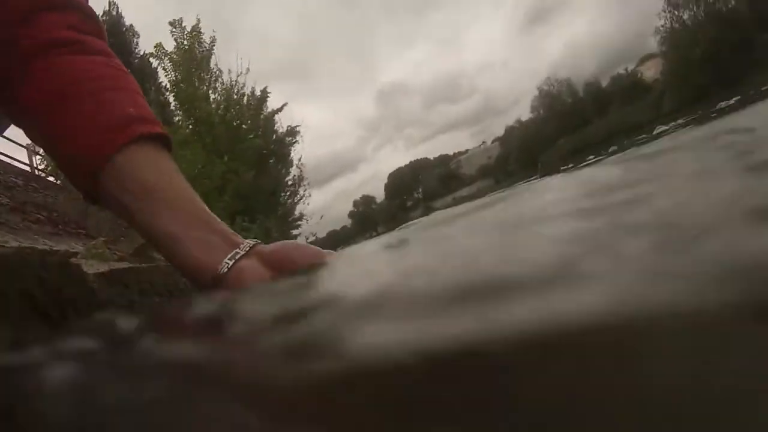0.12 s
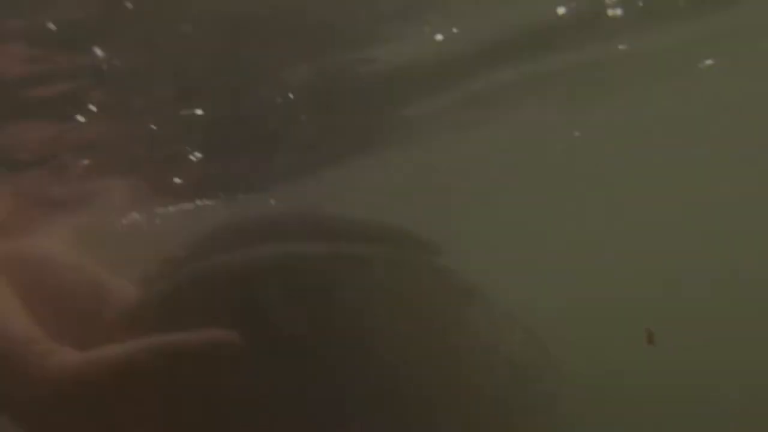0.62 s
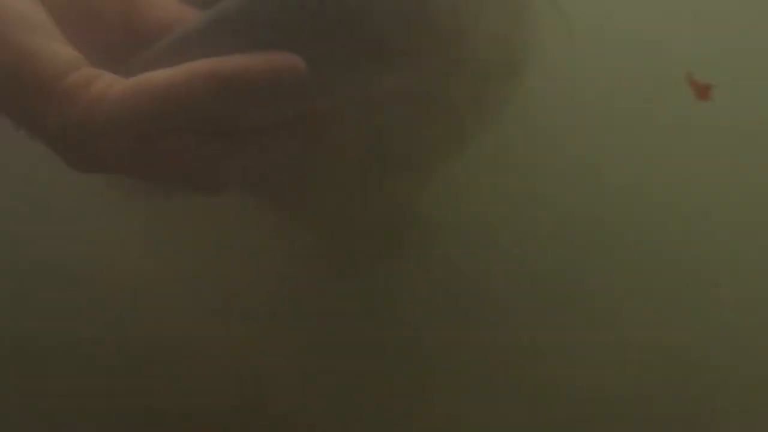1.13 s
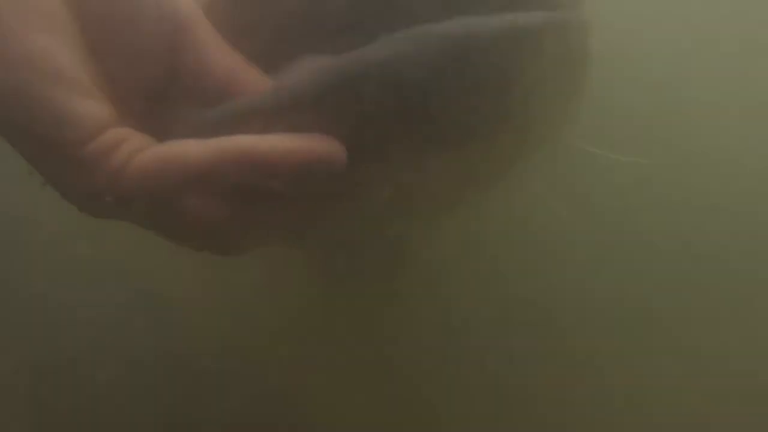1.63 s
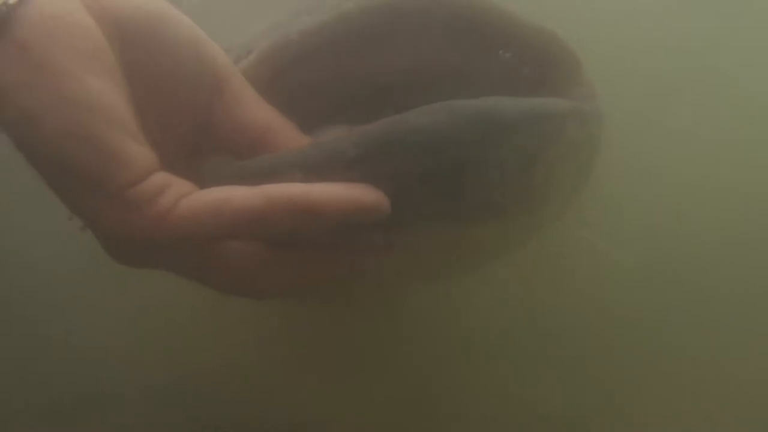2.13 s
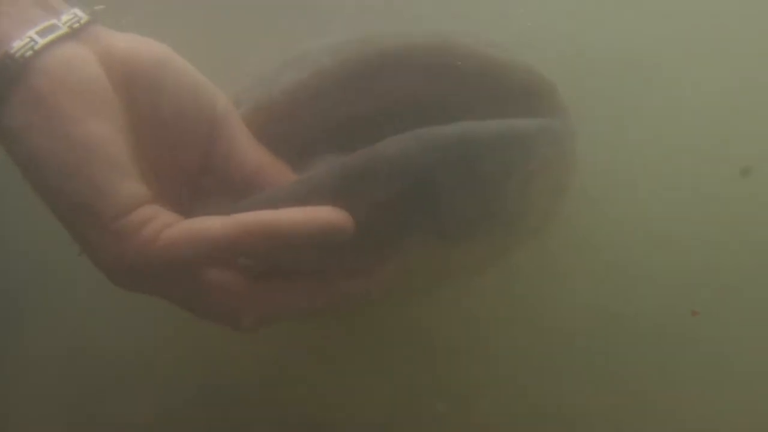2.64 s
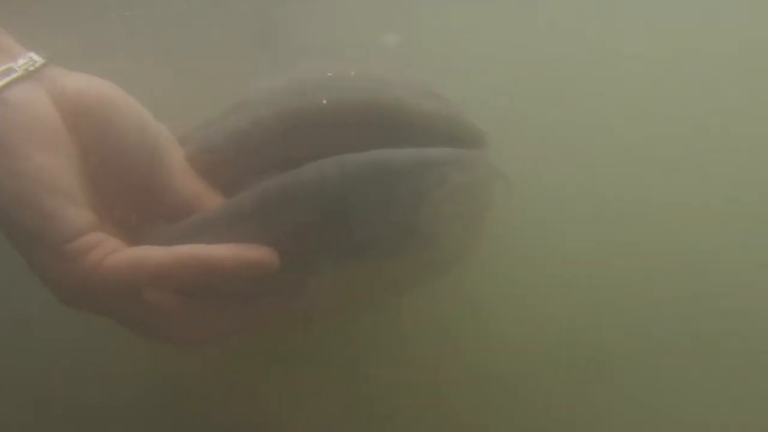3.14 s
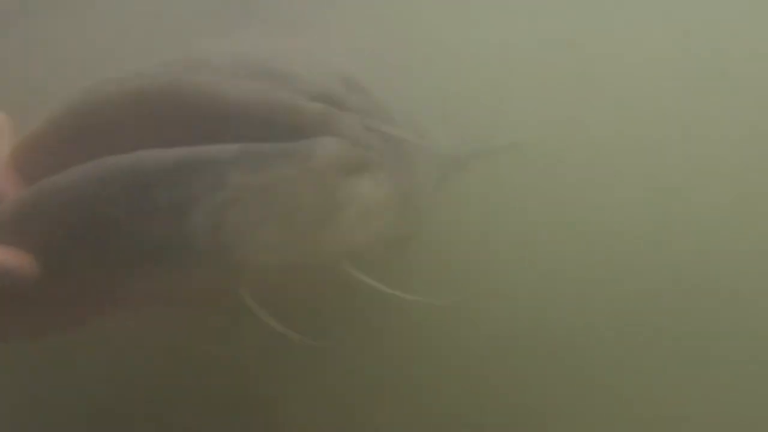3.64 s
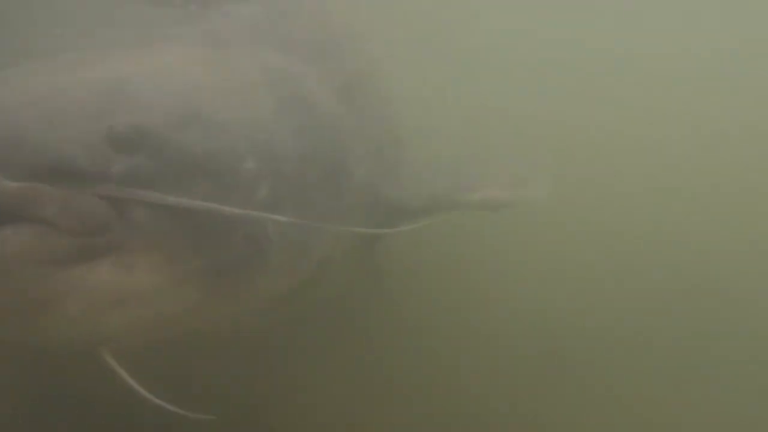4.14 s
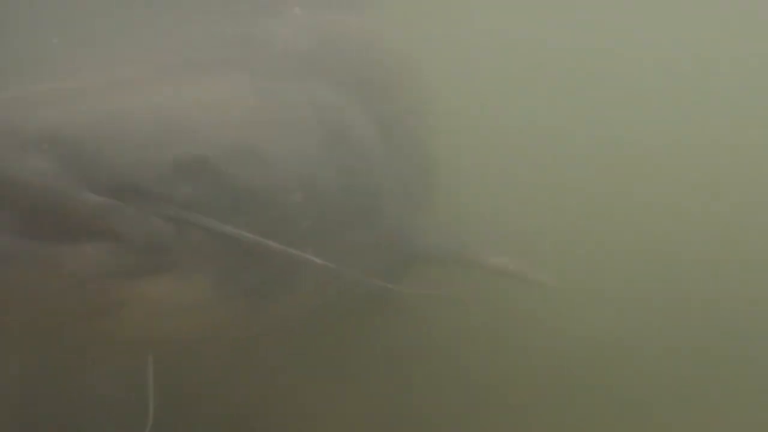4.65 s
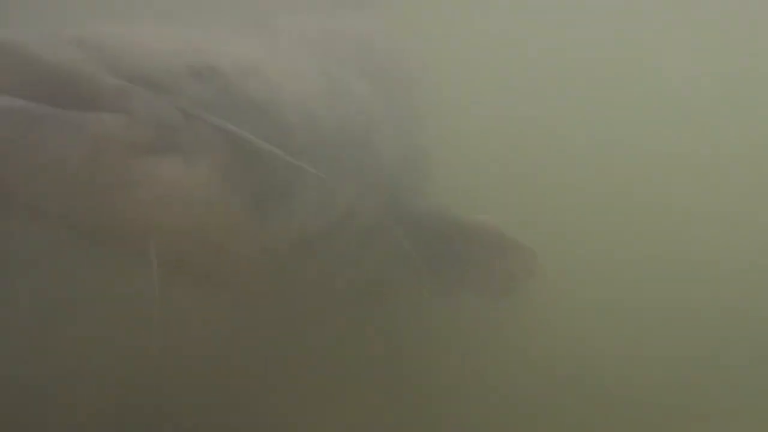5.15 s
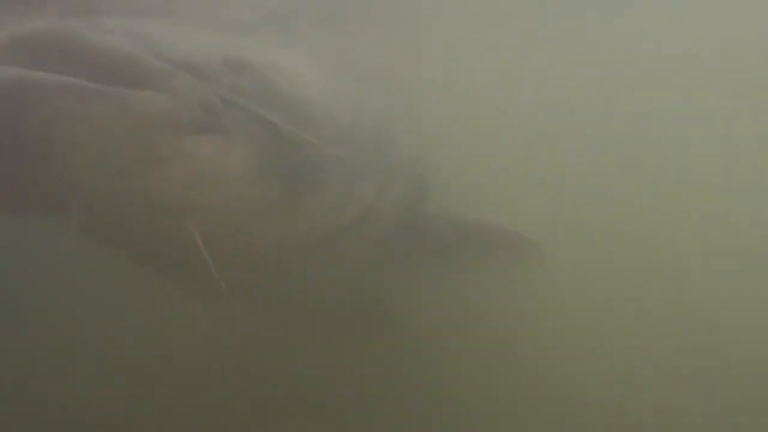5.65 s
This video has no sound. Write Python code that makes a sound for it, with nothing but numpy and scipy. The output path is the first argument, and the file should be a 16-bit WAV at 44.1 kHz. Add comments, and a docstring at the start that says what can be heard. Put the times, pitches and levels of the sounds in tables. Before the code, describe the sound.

A small camera housing is pushed into river water with hard plastic clacks and splashes, then low muffled underwater throbbing and two later clicks.

```python
"""River, just at and under the surface: a small camera in a waterproof housing is pushed in.
Water slaps the housing; trapped air pockets clack and ring as decaying sines with knocks and noisy spray.
Fine bubbles fizz as shaped noise, then slow surges throb on the microphone as smooth pressure dips.
Behind them eddies rumble, gurgle and wash as shaped noise with wandering levels.
The recorder's ring buffer is read late, so each block starts with a sliver from one lap ahead: faint ticks."""
import sys
import numpy as np
from scipy import signal
from scipy.fft import rfft, irfft
from scipy.io import wavfile
from scipy.ndimage import uniform_filter1d

SR = 44100
rng = np.random.default_rng(int(sys.argv[2]) if len(sys.argv) > 2 else 0)


def unload_audio(sound):
    """Save the sound as a 16-bit wav file, at the path given as the first command line argument."""
    columns = np.transpose(np.atleast_2d(sound))
    # keep every value between -1 and 1, then stretch to whole-number steps
    steps = np.round(np.clip(columns, -1, 1) * 32767)
    wavfile.write(sys.argv[1], SR, steps.astype(np.int16))


def rack_gain(trim_db):
    """Turn a fader trim in dB into the linear factor to multiply a signal by."""
    fader = np.asarray(trim_db, float)
    return 10 ** (fader / 20)


N = 254898
SUNK_S = .95  # the housing is under from here on

# flow past the housing: (time [s], rumble level [dB])
FLOW = [(0, -53), (.37, -43), (.66, -49), (.93, -44), (1.5, -46), (2.0, -50), (2.7, -52), (4.25, -55),
        (5.78, -57)]


def coloured(x, spectrum):
    """Shape x by (frequency [Hz], relative density [dB per Hz]) points and bring it to rms 1."""
    hz, db = np.transpose(spectrum)
    f = np.maximum(np.arange(N // 2 + 1) * SR / N, 1)
    gain = rack_gain(np.interp(np.log(f), np.log(hz), db))
    y = irfft(rfft(x) * gain, N)
    return y / np.std(y)


def curve(s, db):
    """Gain along time, straight in dB between the points."""
    return rack_gain(np.interp(np.arange(N) / SR, s, db))


def walk(rate):
    """Wandering control signal: random values held for 1 / rate seconds, then smoothed twice."""
    hold = int(SR / rate)
    steps = np.repeat(rng.standard_normal(N // hold + 1), hold)
    smooth = uniform_filter1d(uniform_filter1d(steps, hold), hold)
    return 1.1 * smooth[:N]


def add(out, s, sound):
    """Mix a sound in at time s, cut off at the end of the scene."""
    i = max(int(s * SR), 0)
    out[i:i + len(sound)] += sound[:N - i]


def ring(hz, t60, t):
    """One resonant mode: a sine that falls by 60 dB in t60 seconds."""
    return np.sin(2 * np.pi * hz * t) * np.exp(-np.log(1000) * t / t60)


def clacks():
    """Each clack swells its own air pocket, pushes the housing into ringing and throws spray."""
    # air pockets and plastic:
    # (time [s], ring peak [dB], ring frequency [Hz], ring t60 [s], housing level [dB])
    clack_table = [(.001, -34, 1484, .043, -33), (.013, -37, 3217, .021, -47), (.053, -45, 1326, .034, -47),
                   (.069, -49, 2200, .01, -46), (.1205, -45, 1557, .025, -33),
                   (.1245, -4.5, 1050, .009, -7), (.125, -14, 2100, .015, -47),
                   (.1315, -13, 1900, .008, -15), (.154, -50, 4520, .012, -46),
                   (.179, -31, 5557, .0064, -46), (.1845, -20, 1217, .085, -24), (.186, -31, 494, .1, -48),
                   (.234, -40, 4200, .015, -53), (.278, -33, 813, .024, -33), (.326, -32, 3111, .017, -30),
                   (.338, -18, 1767, .013, -18), (.35, -40, 4167, .007, -43), (.366, -25, 5895, .004, -36),
                   (.369, -12.5, 1242, .02, -18), (.3905, -7, 1968, .01, -22),
                   (.402, -10.5, 5307, .005, -17), (.4025, -15, 2642, .043, -26),
                   (.414, -3, 2407, .007, -3.5), (.435, -36, 3500, .007, -36), (.446, -24, 676, .032, -25),
                   (.459, -44, 4670, .008, -49), (.501, -22, 1079, .021, -23), (.637, -24, 445, .005, -31),
                   (.668, -15, 1692, .01, -7.5), (.674, -7, 1500, .005, -5.5), (.677, -14, 1893, .03, -14),
                   (.677, -17, 150, .042, -50), (.6805, -5, 725, .03, -8.5), (.708, -14, 651, .028, -20),
                   (.709, -13.5, 160, .036, -50), (.712, -9, 678, .035, -7), (.717, -12, 778, .013, -6.5),
                   (.750, -19, 716, .025, -11), (.753, -13.5, 153, .063, -47), (.754, -16, 681, .027, -1.5),
                   (.7585, -16, 1500, .006, -5.5), (.864, -40, 1520, .013, -56),
                   (.917, -17, 2562, .019, -31), (.9172, -17, 1550, .006, -36), (.918, -24, 916, .033, -35),
                   (1.034, -42, 700, .04, -48), (1.4332, -7.5, 1124, .041, -12),
                   (1.4335, -17, 404, .018, -40), (1.4336, -8.5, 1050, .014, -45),
                   (2.8105, -36, 718, .018, -36), (2.8108, -41, 1297, .015, -50),
                   (3.454, -47, 199, .067, -62), (4.262, -46, 221, .086, -60), (4.642, -48, 230, .092, -60),
                   (4.84, -50, 240, .08, -62), (5.1408, -12, 800, .05, -32), (5.1413, -20, 2305, .008, -35),
                   (5.143, -31, 1357, .03, -55), (5.1433, -17, 860, .03, -45),
                   (5.1444, -21, 1037, .034, -50), (5.53, -46, 150, .03, -60), (5.61, -48, 200, .06, -62)]
    # modes of the housing: (frequency [Hz], relative level [dB], t60 [s])
    housing_modes = [(155, -27, .08), (232.6, -11.5, 0.19), (420, -2.5, 0.027), (634, 1, 0.034),
                     (985, -6, 0.043), (1500, -6, 0.026), (1917, 0, 0.015), (2460, -2, 0.0061),
                     (3500, -2.5, 0.007), (5500, -12.5, .012)]
    # spray grows more slowly than the ring, favours small bright pockets, and dies down once under
    spray_base_db, spray_db_per_db, spray_db_per_octave, sunk_spray_db = -17, .55, 3, -9

    out, t = np.zeros(N), np.arange(int(SR / 4)) / SR
    housing = sum(rack_gain(db) * ring(hz, t60, t) for hz, db, t60 in housing_modes)
    housing /= np.abs(housing).max()
    for s, ring_db, hz, t60, housing_db in clack_table:
        swell = 1 - np.exp(-t * hz / 2.3)  # the pocket fills over a few cycles
        settle = .4 + np.exp(-(t / (0.12 * t60)) ** 2)  # a loud first wobble, then a quieter tail
        pocket = swell * settle * ring(hz, t60, t)

        push = np.hanning(int(.4 * SR / hz) + 3)  # a big pocket pushes longer, so the knock is duller
        knock = np.convolve(housing, push / push.sum())

        # spray: noise loosely centred on the pocket's pitch, dying sooner than its ring
        band = signal.butter(2, [hz / 2.2, hz * 2], "band", fs=SR, output="sos")
        spray = signal.sosfilt(band, rng.standard_normal(len(t)))
        spray /= np.std(spray)
        spray *= swell * np.exp(-np.log(1000) * t / (0.44 * t60))
        spray_db = spray_base_db + spray_db_per_db * ring_db
        spray_db += spray_db_per_octave * np.log2(hz / 1000)
        spray_db += sunk_spray_db * (s > SUNK_S)

        add(out, s, rack_gain(ring_db) * pocket / np.abs(pocket).max())
        add(out, s, rack_gain(housing_db) * knock)
        add(out, s, rack_gain(spray_db) * spray)
    return out


def splash(bursts_per_s=1500, scatter_db=5.0):
    """Fine bubbles: dense small bursts of unequal size over a hiss; each wave rises, holds and fades."""
    # waves of bubbles churning round the housing: (hold start [s], level [dB], hold [s])
    wave_table = [(0, -54, .02), (.06, -60, .005), (.133, -29, .003), (.19, -54, .04), (.282, -45, .045),
                  (.338, -35, .006), (.385, -38, .04), (.645, -45, .04), (.715, -46, .015),
                  (.755, -43, .04), (.8, -47, .03), (.865, -54, .004), (.919, -40, .002), (1.52, -57, .02),
                  (1.96, -61, .015), (2.56, -64, .07)]
    # colour of the fizz: (frequency [Hz], relative density [dB per Hz])
    fizz_colour = [(150, -19.5), (400, 5), (900, 1.5), (1900, 0.5), (2800, -7.5), (3700, -14.5),
                   (5000, -27), (8000, -31.5), (14000, -46)]
    rise_db_s, fall_db_s, rest_db = 1300, 1000, -76  # slopes in dB per second; level between waves

    struck = rng.random(N) < bursts_per_s / SR
    sizes = rack_gain(scatter_db * np.minimum(rng.exponential(size=N), 3))
    smear = signal.lfilter([1], [1, -np.exp(-1 / (0.0005 * SR))], struck * sizes)  # 0.5 ms decays
    fizz = coloured((smear + 1.0) * rng.standard_normal(N), fizz_colour)

    t = np.arange(N) / SR
    waves = np.zeros(N)
    for s, db, hold in wave_table:
        rise = rise_db_s * np.maximum(s - t, 0)
        fall = fall_db_s * np.maximum(t - s - hold, 0)
        waves += rack_gain(db - rise - fall)
    return fizz * (waves + rack_gain(rest_db))


def surges():
    """Each surge is a smooth dip of pressure; lesser nudges come at random once the housing is under."""
    # the strongest surges of water on the microphone membrane:
    # (time [s], depth [dB], half width to 1/e [ms])
    surge_table = [(0.569, -32, 11), (0.681, -31, 11), (0.719, -28, 9.5), (0.752, -33, 17), (0.824, -33, 8),
                   (0.927, -32.2, 6.5), (0.963, -22.7, 18), (1.006, -29.4, 4.5), (1.031, -32.2, 4.5),
                   (1.057, -26.0, 9), (1.17, -19.2, 9), (1.195, -30.6, 18), (1.224, -32.3, 4.5),
                   (1.291, -23.7, 6.5), (1.316, -29.1, 18), (1.359, -17.5, 13), (1.423, -30.0, 9),
                   (1.614, -25.5, 9), (1.699, -28.9, 18), (1.757, -26.7, 13), (1.824, -27.9, 6.5),
                   (1.902, -25.5, 18), (1.962, -26.9, 18), (2.084, -33.4, 18), (2.15, -31.5, 18),
                   (2.219, -32.6, 9), (2.314, -39.2, 9), (2.353, -36.4, 9), (2.75, -38.5, 13),
                   (2.858, -36.7, 13), (2.887, -37.4, 18), (3.129, -37.5, 6.5), (3.399, -36.8, 9),
                   (3.465, -38.8, 13), (3.704, -39.9, 13), (3.748, -34.5, 9), (3.806, -33.2, 6.5),
                   (3.831, -35.1, 18), (3.881, -34.5, 13), (3.942, -32.3, 13), (3.969, -37.2, 18),
                   (4.22, -36.3, 18), (4.298, -38.6, 18), (4.351, -33.5, 13), (4.413, -38.8, 6.5),
                   (4.474, -37.3, 9), (5.009, -39.4, 13), (5.068, -36.9, 13), (5.13, -38.3, 6.5)]
    # small sharp nudges between the surges, sized by the flow
    nudges_per_s, nudge_db, scatter_db, nudge_ms = 14, 5, 4, (2.2, 6.)

    out, t = np.zeros(N), np.arange(-.05, .05, 1 / SR)
    # drawn for the whole length, then squeezed into the time under water
    when, size, width = rng.random((int(nudges_per_s * N / SR), 3)).T
    when = SUNK_S + when * (N / SR - SUNK_S)
    flow_db = np.interp(when, *np.transpose(FLOW))
    depth_db = flow_db + nudge_db - scatter_db * np.log(1 - size)  # many small, few deep
    nudges = zip(when, depth_db, np.interp(width, [0, 1], nudge_ms))
    for s, db, ms in [*surge_table, *nudges]:
        dip = -np.exp(-(1000 * t / ms) ** 2)
        add(out, s + t[0], rack_gain(db) * dip)
    return out


def flow():
    """Eddies rumble in lumps; they gurgle in short bursts, and the wash above flickers."""
    # low eddies: (frequency [Hz], relative density [dB per Hz])
    rumble_colour = [(4.7, -27.5), (8.0, 3.5), (29, 10.5), (65, -8), (193, -31), (222, -21.5), (266, -21.5),
                     (300, -31.5), (390, -57), (660, -120)]
    # dull broad wash: (frequency [Hz], relative density [dB per Hz])
    wash_colour = [(59, -22.5), (100, 4), (160, -3), (211, -7), (1900, -18), (5880, -25.5), (11900, -35.5),
                   (13800, -38.5), (15400, -42), (16400, -68)]
    # the wash follows the flow a little and is weaker until the housing is under
    wash_base_db, wash_db_per_db, afloat_db, sinking_s = -50, .18, -6, .1

    s, rumble_db = np.transpose(FLOW)
    wash_level = curve(s, wash_base_db + wash_db_per_db * rumble_db)
    wash_level *= curve([SUNK_S - sinking_s, SUNK_S], [afloat_db, 0])

    lumps = walk(14)
    rumble = coloured(rng.standard_normal(N), rumble_colour)
    rumble *= rack_gain(3.5 * lumps) * curve(s, rumble_db)

    flicker = rack_gain(0.71 * lumps + 0.38 * walk(40))
    wash = flicker * coloured(rng.standard_normal(N), wash_colour) * wash_level

    band = signal.butter(2, [160., 280.], "band", fs=SR, output="sos")
    swirl = rack_gain(6 * walk(25))
    gurgle = swirl * signal.sosfilt(band, rng.standard_normal(N)) * wash_level
    return rack_gain(11.5) * gurgle + rumble + wash


def scene():
    """Everything that reaches the one microphone."""
    mix = clacks() + splash() + surges() + flow()
    return mix[None]  # one channel


def late_reads(x, short_ms=0.1, long_ms=.45):
    """The writer laps the reader: the first samples of each block come from one buffer lap ahead."""
    # blocks whose late read stands out: (block [number], overwritten [ms])
    late_table = [(3, .33), (4, .15), (5, .2), (16, .45), (20, .3), (21, 1.), (27, .2), (32, .4), (34, .75),
                  (36, .27), (43, .36), (48, 1.5), (60, .18), (61, .42), (64, .34), (74, .2), (76, 3.04),
                  (77, .42), (79, .09), (90, .09), (225, .43), (241, .45), (242, .68)]
    block_s, first_block_s, lap_blocks = 1024 / 48000, .00065, 16

    count = int(N / SR / block_s) + 1
    ms = rng.uniform(short_ms, long_ms, count)
    block, late_ms = np.transpose(late_table)
    ms[block.astype(int)] = late_ms

    place = (np.arange(N) / SR - first_block_s) / block_s  # time counted in blocks
    since_head_ms = (place % 1) * block_s * 1000
    late = since_head_ms < ms[np.floor(place).astype(int)]

    lap = round(lap_blocks * block_s * SR)
    ahead = np.pad(x, [(0, 0), (0, lap)], "reflect")[:, lap:]  # mirrored past the end
    return np.where(late, ahead, x)


def roll_off(x):
    """The treble ends steeply here."""
    return signal.sosfilt(signal.butter(12, 16530, fs=SR, output="sos"), x)


def record(dry):
    """The vent behind the membrane bleeds off slow pressure; then the late buffer and a soft top."""
    vent = signal.butter(2, 14., "high", fs=SR, output="sos")
    soft_top = signal.butter(4, 15000., fs=SR, output="sos")
    vented = signal.sosfilt(vent, dry)
    mix = signal.sosfilt(soft_top, late_reads(vented))
    return roll_off(mix)


dry = scene()
out = record(dry)
unload_audio(out)
```